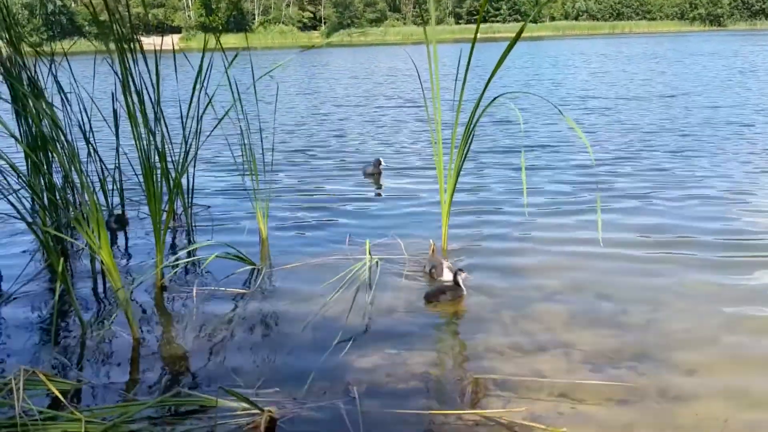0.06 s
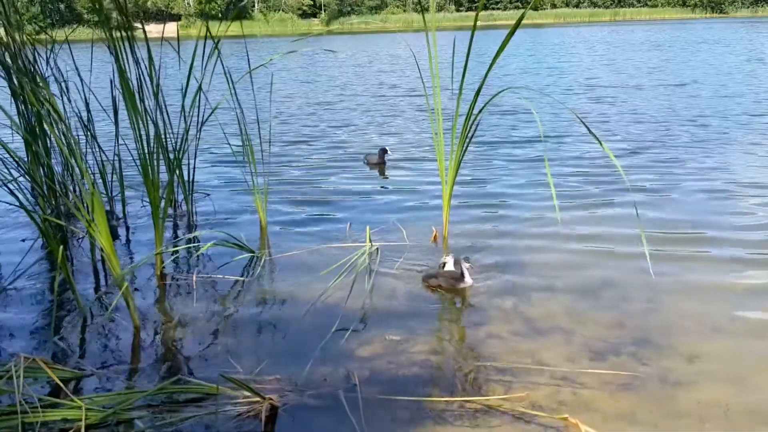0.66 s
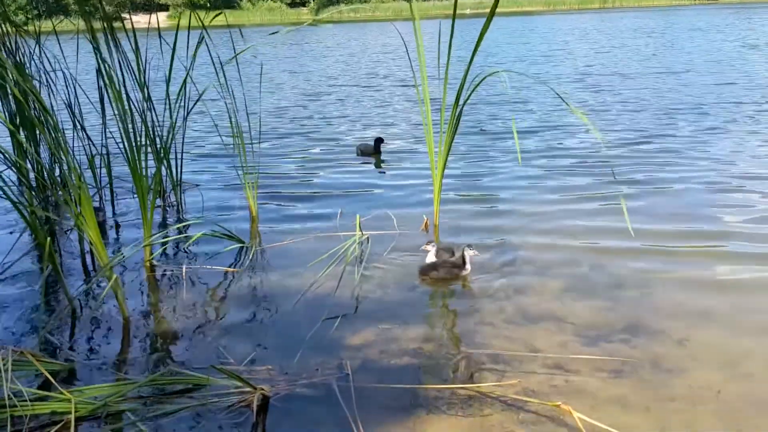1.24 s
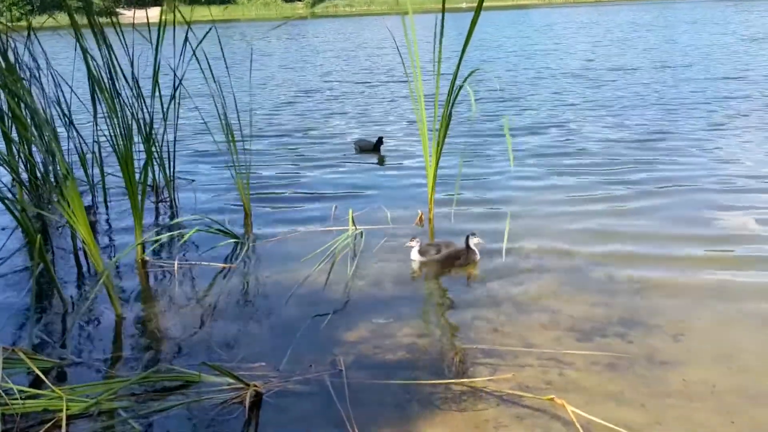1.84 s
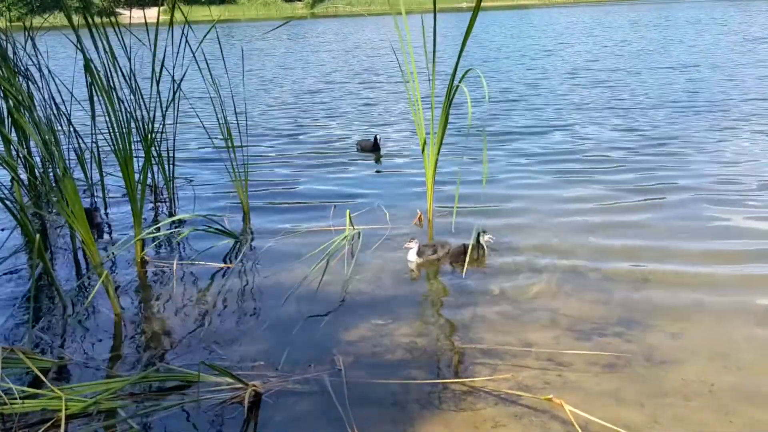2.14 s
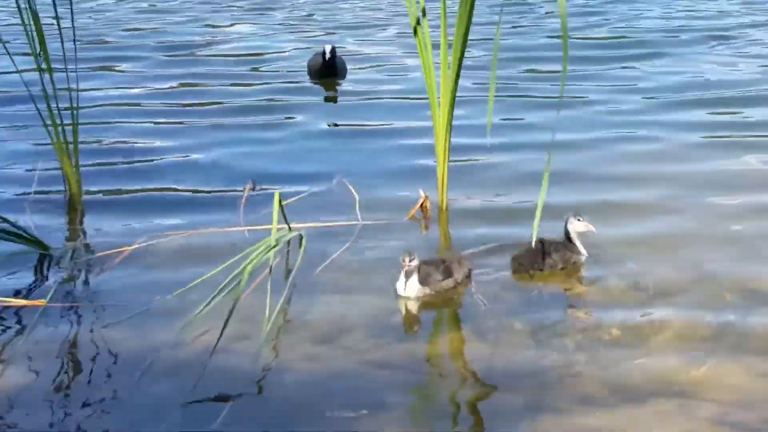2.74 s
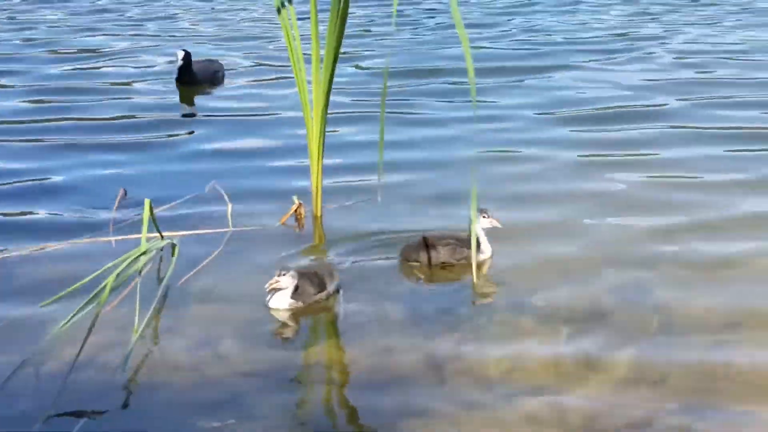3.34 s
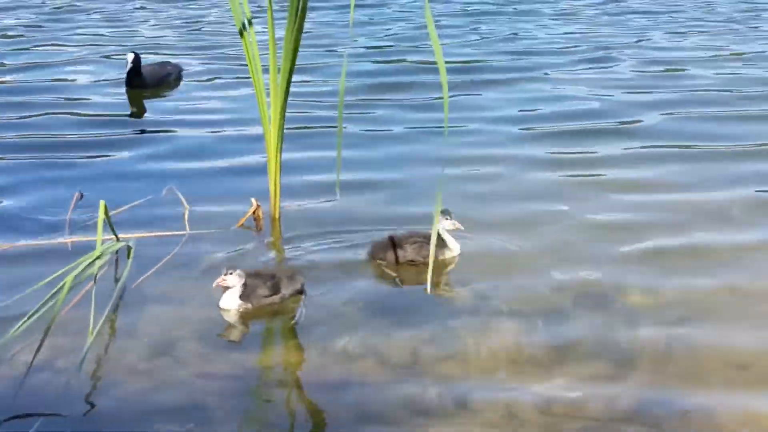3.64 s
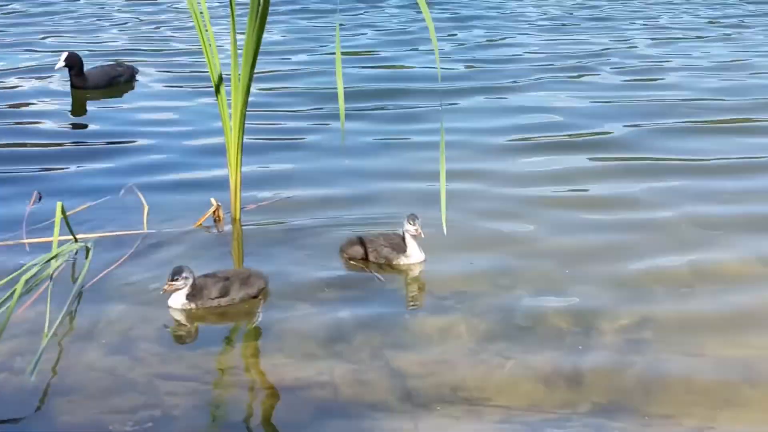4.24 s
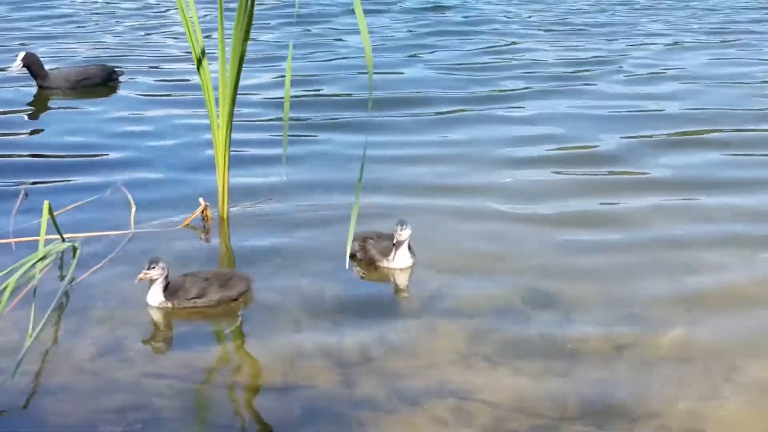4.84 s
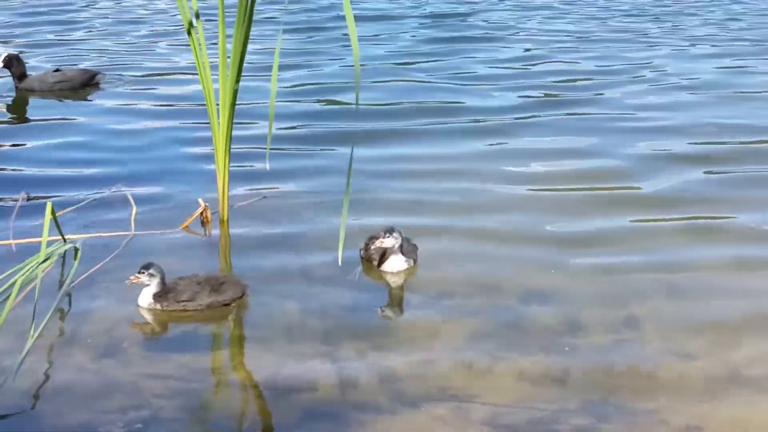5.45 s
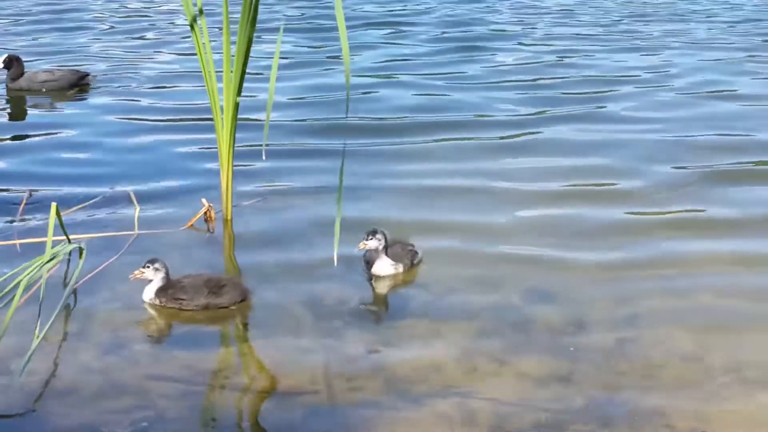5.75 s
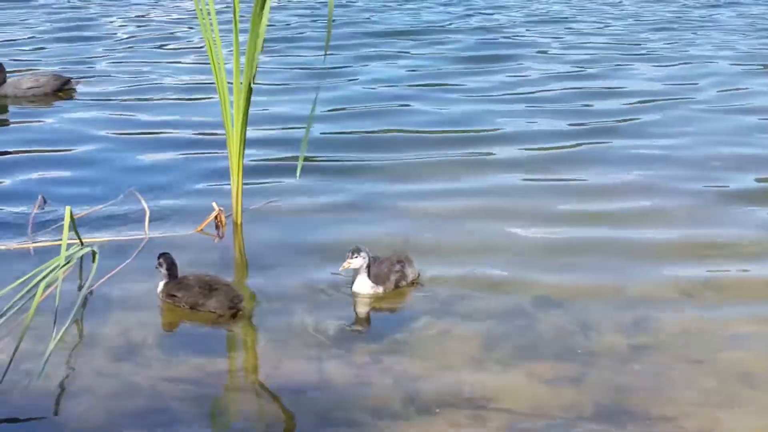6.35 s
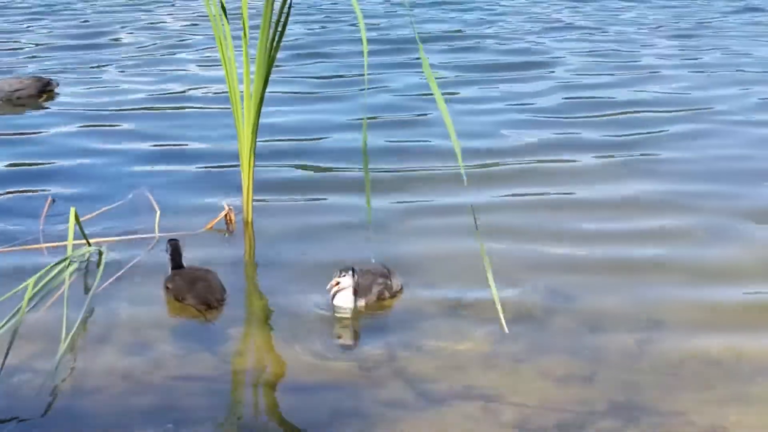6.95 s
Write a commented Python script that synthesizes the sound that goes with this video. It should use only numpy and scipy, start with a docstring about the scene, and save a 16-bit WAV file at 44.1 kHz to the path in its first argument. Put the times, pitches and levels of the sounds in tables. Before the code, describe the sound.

Young coots beg near a lake shore, their thin, raspy whines breaking upward into wavering peeps and whistles, with fainter chick calls between. Wind buffets the microphone with low thumps, mostly in the middle. After it eases, one chick gives a short spitting sneeze, and more whines and peeps follow. Reeds and ripples hiss evenly throughout, and a dull distant drone grows toward the end.

```python
"""Young coots beg off a lake shore: thin whines break upward into peeps and whistles.
Each voice is a vibrating membrane that jitters, splits and rasps when pushed with air.
A fainter chick answers, and one gives a short spitting sneeze: bill snaps, pops, spray.
Gusts buffet the two microphone ports over the hiss of reeds and ripples;
a dull distant drone grows toward the end."""
import sys
import numpy as np
from scipy import signal
from scipy.fft import rfft, irfft, next_fast_len
from scipy.io import wavfile
from scipy.ndimage import uniform_filter1d, map_coordinates

SR = 44100
rng = np.random.default_rng(int(sys.argv[2]) if len(sys.argv) > 2 else 0)


def to_wav(sig):
    """Store sig (one row per channel, or 1-D mono) as 16-bit WAV at the path in sys.argv[1].

    Samples outside -1..1 are clipped; the rate is SR.
    """
    pcm = np.clip(np.atleast_2d(sig), -1, 1) * 32767
    pcm = np.round(pcm).astype(np.int16)
    wavfile.write(sys.argv[1], SR, pcm.T)  # frames by channels


N = 308259
T = np.arange(N) / SR

# One curve per call. Each row: time in seconds, pitch in Hz, tone and air push in relative dB.
WHINE_CALLS = [
    [(0.72, 1470, -75, -70), (0.77, 1440, -68, -65.5), (0.828, 1410, -79, -57), (0.86, 1440, -75, -62.5),
     (0.886, 1390, -74, -69), (0.944, 1400, -74, -68), (1.0, 1470, -77, -69)],
    [(1.012, 1690, -75, -68.5), (1.025, 1677, -65, -66), (1.063, 1520, -70, -70.5), (1.09, 1580, -67, -65),
     (1.117, 1656, -56, -62), (1.127, 1680, -70, -62), (1.175, 1900, -62, -61.5)],
    [(3.165, 1735, -58.5, -64), (3.173, 1724, -57, -67), (3.197, 1660, -54, -54.5),
     (3.231, 1690, -57, -63.5), (3.291, 1648, -59, -59.5), (3.315, 1660, -53.5, -54),
     (3.335, 1650, -49.5, -52), (3.363, 1625, -66.5, -51.5), (3.385, 1635, -51.5, -53.5),
     (3.424, 1655, -50.5, -56), (3.442, 1790, -56, -54), (3.462, 2080, -65, -57)],
    [(5.38, 1750, -61.5, -75.5), (5.432, 1603, -58, -59), (5.486, 1695, -63, -76), (5.528, 1756, -58, -74),
     (5.572, 1692, -55.5, -59), (5.59, 1668, -59, -58.5), (5.656, 1676, -59.5, -67.5),
     (5.668, 1685, -57, -74.5), (5.722, 1689, -57.5, -56.5), (5.782, 1703, -63, -59),
     (5.794, 1667, -56.5, -56), (5.812, 1657, -64.5, -56.5), (5.852, 1540, -56, -59),
     (5.865, 1480, -62, -57.5)],
    [(6.665, 1570, -81, -76.5), (6.691, 1660, -67.5, -70.5), (6.747, 1755, -72.5, -71),
     (6.769, 1800, -73, -87), (6.787, 1790, -70, -79), (6.813, 1840, -74, -63)],
    [(6.895, 1990, -66, -66), (6.903, 1980, -60, -58), (6.915, 1890, -60, -51), (6.928, 1880, -56, -48),
     (6.942, 1970, -55, -46), (6.952, 1930, -57, -46.5), (6.964, 1917, -55, -44.5), (6.972, 1900, -57, -45)],
]
# One row per call: harmonics 1, 2, 3 in dB re tone, then rasp, low and high bill air in dB re push.
WHINE_BILL_DB = [(-29, 4.5, -28, -2, -16, -24), (-14, -2, -23, 0, -18, -18), (-12.5, -1, -25, 0, -3, -7),
                 (-28, -2, -29, .5, -4, -6), (3, 5, 1.5, -7.5, -16.5, -11), (-12, 3, -26, -3.5, -5.5, -9)]
# Throat response at rest pitch. Each row: frequency in Hz, gain in dB.
WHINE_THROAT = [(500, -8), (1000, -0.5), (1350, 13.5), (1640, 23), (1950, 14), (2300, 12), (2750, 17),
                (3250, 16.5), (3700, -2), (4400, -9), (4900, -4), (5600, -5), (6600, 10), (12000, -25)]


def whines():
    """Low register, carried by the membrane's second harmonic."""
    return voice(WHINE_CALLS, WHINE_BILL_DB, WHINE_THROAT, rest_hz=1650,
                 tone_db=10, shimmer_db=1.8, waver=.009, jitter=.026,
                 rasp_db=5, rasp_onset_db=-67.5, rattle=.15, throb=.45, flap_db=-8,
                 thirds=(4, 5), thirds_db=-9, growl_db=8, squeal_db=-3, squeal_onset_db=-88)


# One curve per call. Each row: time in seconds, pitch in Hz, tone and air push in relative dB.
PEEP_CALLS = [
    [(1.177, 2434, -66, -85), (1.187, 2430, -54, -79), (1.199, 2410, -54, -69.5), (1.265, 2515, -51, -71.5),
     (1.282, 2483, -53.5, -60), (1.305, 2565, -50, -57.5), (1.338, 2623, -49, -62), (1.371, 2386, -47, -71),
     (1.385, 2210, -67, -80)],
    [(2.04, 2310, -72, -67.5), (2.11, 2397, -61, -62), (2.2, 2490, -63.5, -58), (2.278, 2658, -57.5, -54),
     (2.308, 2603, -62.5, -52.5), (2.324, 2562, -56, -55.5), (2.348, 2472, -56, -53),
     (2.36, 2342, -75, -50.5)],
    [(2.365, 2970, -49, -59.5), (2.379, 2452, -45.5, -54.5), (2.399, 2052, -42, -57.5),
     (2.411, 1960, -48, -74), (2.422, 1964, -71, -76)],
    [(3.465, 2668, -53.5, -65), (3.5, 2663, -52.5, -55.5), (3.523, 2729, -53, -52), (3.542, 2830, -45, -55),
     (3.556, 3030, -49.5, -50), (3.582, 2927, -47, -51.5), (3.62, 2880, -41, -52.5),
     (3.627, 2740, -49, -54), (3.638, 2655, -54, -62), (3.645, 2490, -61, -70)],
    [(6.816, 2300, -56, -78), (6.828, 2457, -48, -74), (6.838, 2525, -44, -61), (6.879, 2559, -41.5, -61),
     (6.896, 2566, -43, -60), (6.902, 2638, -44, -55), (6.912, 2540, -46, -55), (6.921, 2504, -40, -54)],
]
# One row per call: harmonics 1, 2, 3 in dB re tone, then rasp, low and high bill air in dB re push.
PEEP_BILL_DB = [(-3, -6.5, -18, -1, -.5, 9.5), (-24, -5.5, -25, -10.5, 1.5, -18),
                (-2.5, -23, -32.5, -4.5, 1.5, -16), (1.5, -9.5, -22, -.3, -6.5, 1),
                (1.5, -11.5, -30.5, -6, -8, -1)]
# Throat response at rest pitch. Each row: frequency in Hz, gain in dB.
PEEP_THROAT = [(700, -18), (1450, -12), (1800, 2), (2150, 14.5), (2600, 14), (3100, 12), (3700, 13.5),
               (4400, 9), (4800, 7), (5400, 11), (6300, 4), (7500, -2), (12000, -28)]


def peeps():
    """High register, where the membrane splits more strongly into thirds of its pitch."""
    return voice(PEEP_CALLS, PEEP_BILL_DB, PEEP_THROAT, rest_hz=2600,
                 tone_db=5.5, shimmer_db=1.2, waver=.00613, jitter=.03,
                 rasp_db=7, rasp_onset_db=-73, rattle=.2, throb=.4, flap_db=2,
                 thirds=(2, 4, 5, 7, 8), thirds_db=2, growl_db=-10, squeal_db=8, squeal_onset_db=-57)


def voice(calls, bills, throat, rest_hz, tone_db, shimmer_db, waver, jitter, rasp_db, rasp_onset_db,
          rattle, throb, flap_db, thirds, thirds_db, growl_db, squeal_db, squeal_onset_db):
    """A vibrating membrane; pushed hard, it jitters, splits into thirds of its pitch and rasps."""
    gate, hz, *harmonics_db, push_db, low_air_db, high_air_db = effort(calls, bills)
    drive = above(push_db, rasp_onset_db)
    strain = drive / (drive + sum(undb(db) for db in harmonics_db))
    phase = syrinx(hz, waver, jitter * strain)
    tone = sum(undb(db) * np.sin(k * phase) for k, db in enumerate(harmonics_db, 1))
    chop = 1 + .8 * strain * walk(450)
    tone *= chop * undb(tone_db + shimmer_db * walk(90))
    split = undb(thirds_db) * split_tones(hz, phase, thirds)
    rasp = undb(rasp_db) * throat_rasp(hz, rest_hz, throat, flap_db, rattle)
    growl = undb(growl_db) * strain * np.sin(phase)
    pulsing = unit(1 + throb * np.cos(syrinx(hz / 12, waver=.15, jitter=.2)))
    hoarse = drive * pulsing * (rasp + split + growl)
    squeal = undb(squeal_db) * above(low_air_db, squeal_onset_db) * bill_squeal(hz, phase)
    return gate * (tone + squeal + hoarse + bill_air(low_air_db, high_air_db))


def effort(calls, bills):
    """Gate, pitch and six levels: harmonics follow the tone; rasp and bill air follow the push."""
    shaped = []
    for call, bill in zip(calls, np.array(bills)):
        shaped.append([(s, hz, *(tone_db + bill[:3]), *(push_db + bill[3:]))
                       for s, hz, tone_db, push_db in call])
    return phrases(shaped, edge_s=.0021)


def syrinx(hz, waver, jitter):
    """Phase of a membrane whose pitch trembles slowly and jitters fast."""
    return 2 * np.pi * np.cumsum(hz * (1 + waver * walk(70) + jitter * walk(900))) / SR


def split_tones(hz, phase, thirds):
    """Wandering partials at thirds of the pitch; the throat passes 2.2-4.5 kHz best."""
    out = np.zeros(N)
    for k in thirds:
        throat_gain = np.interp(k * hz / 3, [1500, 2200, 4500, 7000], [.5, 1, 1, .4])
        out += throat_gain * (1 + .5 * walk(160)) * np.sin(k * phase / 3 + 1.1 * walk(450))
    return out


def throat_rasp(hz, rest_hz, throat, flap_db, rattle):
    """Turbulence and irregular flaps; the throat tightens with pitch, so its resonances glide."""
    flap_phase = syrinx(hz / 6, waver=.04, jitter=.05)
    flaps = unit(np.exp(60 * (np.cos(flap_phase) - 1)))
    at_rest = colour(rng.standard_normal(N) + undb(flap_db) * flaps, throat)
    gliding = map_coordinates(at_rest, [np.cumsum(hz / rest_hz)], mode="mirror")
    return gliding * unit(np.exp(rattle * walk(300)))


def bill_squeal(hz, phase, resonance_hz=9800, width_hz=1000):
    """Whichever high harmonic meets the bill's resonance squeals."""
    squeal = sum(np.exp(-((k * hz - resonance_hz) / width_hz) ** 2) * np.sin(k * phase)
                 for k in (4, 5, 6))
    return squeal * (1 + .9 * walk(400))


def bill_air(low_db, high_db):
    """Air forced through the bill rings two treble bands."""
    low_hz_db = [(7000, -48), (8400, 7), (10000, 13), (10600, -2), (11400, 2), (12600, -4)]
    high_hz_db = [(10500, 9), (12400, -2), (13600, 8.5), (15000, -2), (15700, 2)]
    low = above(low_db, -81) * colour(rng.standard_normal(N), low_hz_db)
    high = above(high_db, -85) * colour(rng.standard_normal(N), high_hz_db)
    return (low + undb(-3) * high) * undb(1.7 * walk(150))


# Each row: start and length in seconds, first, middle and last pitch in Hz, relative level in dB,
# attack in seconds, trill depth from 0 to 1.
WHISTLE_NOTES = [ (0.575, 0.13, 2065, 2380, 2240, -69, 0.022, 0.5),
                 (0.747, 0.21, 8750, 8330, 8450, -65.5, .02, 0),
                 (0.997, 0.17, 9000, 9100, 8900, -72, .02, 0), (1.153, 0.04, 2320, 2150, 1840, -61, .01, 0),
                 (1.981, 0.2, 2090, 2034, 1976, -59.5, 0.033, 0.9),
                 (2.234, 0.045, 2320, 2070, 1860, -56, 0.019, 0.02),
                 (2.361, .03, 3600, 2946, 2300, -48, .012, .4),
                 (2.451, 0.056, 2520, 2460, 2305, -62.5, 0.0073, 0),
                 (2.511, 0.073, 2440, 2466, 2324, -60.5, .01, 0.1),
                 (2.589, 0.097, 2320, 2400, 2310, -67, .01, .4),
                 (2.84, 0.13, 1936, 1883, 1954, -57.5, 0.055, 0),
                 (2.952, 0.082, 1916, 2520, 2910, -60, .01, 0.2),
                 (3.039, 0.059, 2420, 2220, 2130, -62.5, .01, .4),
                 (3.116, 0.12, 2260, 2086, 1910, -60, .008, 0.1),
                 (3.235, 0.048, 2200, 2020, 1975, -63, 0.0073, 0),
                 (3.318, 0.11, 5110, 4690, 5240, -53.5, 0.0087, 0),
                 (3.385, 0.077, 1522, 1423, 1393, -51.5, 0.017, .3),
                 (3.463, 0.0297, 2620, 2070, 1823, -50, 0.0062, 0),
                 (3.465, .05, 7990, 7900, 7800, -57, .008, 0),
                 (3.474, 0.11, 4320, 4440, 4860, -48, 0.013, 0.8),
                 (3.502, 0.084, 2350, 2320, 2420, -49, 0.035, .9),
                 (5.853, 0.033, 2750, 2290, 1920, -55.5, .007, 0.1),
                 (6.545, 0.033, 3360, 3050, 3030, -65.5, .008, 0),
                 (6.725, 0.059, 2850, 3100, 3380, -58, 0.0069, 0),
                 (6.84, 0.03, 4255, 4225, 4270, -54, 0.0071, 0),
                 (6.972, 0.036, 4590, 4560, 4540, -42.5, 0.0031, 0), ]
# Each row: relative level in dB, pitch jitter in Hz.
JITTER_BY_LEVEL = [(-66, 80), (-58, 52), (-48, 48)]


def whistles(release_s=.004, trill_hz=47, smooth_share=.35):
    """Thin whistles and chips bend through an arc and may trill; softer ones are breathier."""
    out = np.zeros(N)
    waver, jitter, shimmer = .0059 * walk(70), walk(900), undb(1.7 * walk(100))
    for start_s, length_s, first_hz, middle_hz, last_hz, db, attack_s, depth in WHISTLE_NOTES:
        on = (T >= start_s) & (T < start_s + length_s)
        age_s = T[on] - start_s
        arc = np.polyfit([0, .5, 1], [first_hz, middle_hz, last_hz], 2)
        hz = np.polyval(arc, age_s / length_s)
        jitter_hz = np.interp(db, *np.transpose(JITTER_BY_LEVEL))
        phase = 2 * np.pi * np.cumsum(hz * (1 + waver[on]) + jitter_hz * jitter[on]) / SR
        envelope = np.minimum(age_s / attack_s, 1) * np.minimum((length_s - age_s) / release_s, 1)
        trill_ramp = np.clip((age_s - smooth_share * length_s) * 2 * trill_hz, 0, 1)
        trill = unit(1 - depth * trill_ramp * np.cos(2 * np.pi * trill_hz * age_s))
        tilt_db = np.interp(hz, [2500, 4300], [3, 1])
        out[on] += undb(db + tilt_db) * envelope * trill * shimmer[on] * np.sin(phase)
    return out


# Each row: start in seconds, level in dB, centre and width in Hz, decay in seconds.
BILL_SNAPS = [(5.1526, -22, 13500, 8000, .0008), (5.1528, -32, 4500, 4000, .001),
              (5.1558, -30, 7000, 12000, .0012)]
# Each row: start in seconds, level in dB, pitch in Hz, decay in seconds.
AIR_POPS = [(5.1560, -23.5, 760, 0.0011), (5.1608, -29, 636, 0.0043), (5.1606, -34, 405, 0.0058),
            (5.165, -28.5, 690, 0.00034)]
# Each row: frequency in Hz, gain in dB.
SPRAY_SPECTRUM = [(1000, -9), (2000, -13), (3100, 1.5), (4200, -17), (5300, 4.5), (7200, 4), (8600, -5),
                  (11500, -3.5), (13800, 8), (15500, 3.5)]
# Each row: time in seconds, level in dB.
SPRAY_ENVELOPE = [(5.1525, -33), (5.156, -43), (5.17, -40.5), (5.19, -45), (5.23, -43.5), (5.25, -52),
                  (5.275, -57)]


def sneeze():
    """The bill snaps, air pops out, and a fine spray hisses after it."""
    gate, spray_db = phrases([SPRAY_ENVELOPE], edge_s=.011)
    out = gate * colour(stereo_noise(.047), SPRAY_SPECTRUM) * undb(spray_db + .89 * walk(550))
    for start_s, db, hz, width_hz, decay_s in BILL_SNAPS:
        band_hz_db = [(max(hz - width_hz / 2, 500), -4), (hz, 0), (hz + width_hz / 2, -4)]
        envelope = (T >= start_s) * np.exp(-np.abs(T - start_s) / decay_s)
        out += undb(db) * envelope * colour(stereo_noise(.024), band_hz_db)
    for start_s, db, hz, decay_s in AIR_POPS:
        age_s = np.maximum(T - start_s, 0)
        out += undb(db) * np.sin(2 * np.pi * hz * age_s) * np.exp(-age_s / decay_s)
    return out


# Each row: frequency in Hz, phase lag of the left port in radians.
LEFT_PORT_LAG = [(0, -1), (1700, 2.05), (1790, 5), (1950, 5), (2330, 7), (2580, 8), (2680, 10.5), (2900, 9),
                 (3080, 8), (3400, 8), (4400, 14.5), (5200, 13), (9000, 20.5), (14000, 25.5)]


def over_water(x, wet_db, t60_s, pan_db):
    """The two ports hear the birds out of step; reeds and bank scatter a short tail."""
    size = next_fast_len(N)
    lag_rad = np.interp(np.arange(size // 2 + 1) * SR / size, *np.transpose(LEFT_PORT_LAG))
    left = irfft(rfft(x, size) * np.exp(-1j * lag_rad), size)[:N]
    direct = np.array([left * undb(pan_db / 2), x * undb(-pan_db / 2)])
    age_s = T[:SR // 2]
    tail = rng.standard_normal((2, len(age_s))) * undb(-60 * age_s / t60_s) * (age_s > .003)
    tail /= np.sqrt(np.sum(tail ** 2, axis=1, keepdims=True))
    return direct + undb(wet_db) * signal.fftconvolve(x[None], tail, axes=1)[:, :N]


# Each row: time in seconds, relative level in dB.
GUST_ENVELOPE = [(0.0, -70.5), (0.64, -67.5), (0.82, -70.5), (1.75, -71.5), (1.87, -55), (2.2, -74.5),
                 (2.33, -60), (2.49, -52), (2.74, -45.5), (3.02, -54.5), (3.39, -49.5), (3.56, -50),
                 (3.63, -64), (3.95, -61.5), (4.36, -60.5), (4.65, -48.5), (4.78, -55.5), (4.84, -65),
                 (5.04, -73), (6.99, -87)]
# Each row: centre in seconds, relative peak in dB, length in seconds.
WIND_BUFFETS = [(0.298, -57, 0.024), (0.43, -58, .03), (0.649, -56, 0.088), (1.117, -57, 0.05),
                (1.303, -54.5, 0.17), (1.53, -52.5, 0.022), (1.716, -54.5, 0.071), (1.832, -48.5, 0.033),
                (1.924, -56, 0.06), (1.975, -48, 0.037), (2.04, -59, 0.073), (2.312, -48, 0.044),
                (2.384, -39.5, 0.12), (2.602, -36, 0.072), (2.65, -31, 0.061), (2.777, -50, 0.059),
                (2.855, -42, 0.051), (2.967, -42, 0.087), (3.069, -33.5, 0.05), (3.107, -43.5, 0.038),
                (3.25, -32.5, 0.089), (3.393, -38, 0.11), (3.82, -49, 0.13), (4.061, -46, 0.047),
                (4.128, -46, 0.047), (4.242, -39, 0.071), (4.299, -41.5, 0.064), (4.44, -55, 0.077),
                (4.548, -40, 0.032), (4.641, -33, 0.038), (4.777, -46.5, 0.068), (5.592, -50, 0.056),
                (6.307, -51.5, 0.053)]
# Each row: frequency in Hz, gain in dB.
EDDY_SPECTRUM = [(25, -42), (40, -21), (64, 2.5), (88, 3), (120, 1), (170, -5), (280, -17.5), (400, -46),
                 (700, -52)]


def wind(gust_gain_db=2.5, flutter_db=3, flutter_hz=13, fine_gain_db=-13.5, fine_onset_db=-47.5):
    """Eddies push on the ports: a low flutter with short buffets; hard ones shed finer eddies."""
    power = undb(curves(GUST_ENVELOPE)[0] + gust_gain_db + flutter_db * walk(flutter_hz)) ** 2
    for centre_s, db, length_s in WIND_BUFFETS:
        power += undb(db) ** 2 * np.exp(-np.pi * np.minimum((2 * (T - centre_s) / length_s) ** 2, 20))
    eddies = colour(stereo_noise(.027), EDDY_SPECTRUM)
    # Levelled so that each buffet carries its full force.
    eddies /= np.sqrt(uniform_filter1d(np.mean(eddies ** 2, axis=0), int(.0563 * SR)))
    fine = colour(stereo_noise(.1), [(110, -12), (170, -2.5), (240, -4), (340, -24)])
    fine *= undb(fine_gain_db) * above(10 * np.log10(power), fine_onset_db)
    return undb(.5) * np.sqrt(power) * eddies + fine


# Each row: frequency in Hz, gain in dB.
SHORE_SPECTRUM = [(150, -50), (260, 6), (298, -45), (399, -2), (524, -4), (666, -1), (954, -4),
                  (1170, -3.5), (1540, -10), (2280, -3), (2490, -3), (4370, -4), (7300, -4.5), (10600, -13),
                  (15500, -10.5)]


def shore(level_db=-58.14):
    """Reeds and ripples hiss almost evenly."""
    ripple_db = .25 * walk(3) + .4 * walk(25)
    return colour(stereo_noise(.0099), SHORE_SPECTRUM) * undb(level_db + ripple_db)


# Each row: frequency in Hz, gain in dB.
DRONE_SPECTRUM = [(41, -4), (70, -8.5), (107, 1), (140, -3), (233, -2), (447, -10.5), (670, -16.5),
                  (924, -30), (1200, -76), (1560, -71), (2640, -120)]
# Each row: time in seconds, level in dB.
DRONE_ENVELOPE = [(0, -75), (3.8, -63), (4.6, -65.5), (5.4, -61.5), (6.3, -62), (6.99, -60)]


def drone():
    """A dull drone grows far away."""
    rumble = colour(stereo_noise(.95), DRONE_SPECTRUM)
    return rumble * undb(curves(DRONE_ENVELOPE)[0] + .64 * walk(16))


def undb(db):
    """Decibels to gain."""
    return 10 ** (np.asarray(db) / 20)


def unit(x):
    """Scale to rms 1."""
    return x / np.sqrt(np.mean(np.abs(x) ** 2))


def above(db, threshold_db):
    """Gain of a sound that only sets in over a threshold."""
    return np.sqrt(np.maximum(undb(db) ** 2 - undb(threshold_db) ** 2, 0))


def colour(x, points):
    """Filter by (Hz, dB) points, falling steeply beyond the ends; rms 1."""
    hz, db = np.transpose(points)
    size = next_fast_len(N)
    log_hz = np.log(np.maximum(np.arange(size // 2 + 1) * SR / size, 1))
    beyond = np.abs(log_hz - np.clip(log_hz, np.log(hz[0]), np.log(hz[-1])))
    gain = undb(np.interp(log_hz, np.log(hz), db) - 400 * beyond)
    return unit(irfft(rfft(x, size) * gain, size)[..., :N])


def walk(rate_hz):
    """Smooth random curve, rms 1."""
    hold = max(int(SR / rate_hz), 1)
    steps = np.repeat(rng.standard_normal(N // hold + 1), hold)
    return unit(uniform_filter1d(steps, hold)[:N])


def stereo_noise(correlation):
    """Left and right white noise, partly alike."""
    mid, side = rng.standard_normal((2, N))
    return np.sqrt(1 + correlation) * mid + np.sqrt(1 - correlation) * np.array([side, -side])


def curves(rows):
    """Columns of a timed table at every sample."""
    times_s, *columns = np.transpose(rows)
    return [np.interp(T, times_s, column) for column in columns]


def phrases(calls, edge_s):
    """A gate that opens during each call, then the curves of all calls."""
    gate = sum(np.clip(np.minimum(T - call[0][0], call[-1][0] - T) / edge_s + .5, 0, 1)
               for call in calls)
    rows = sorted(tuple(row) for call in calls for row in call)
    return [np.minimum(gate, 1)] + curves(rows)


def scene():
    """Chicks on the water, wind, shore and drone."""
    chicks = over_water(whines() + peeps() + whistles(), wet_db=-5, t60_s=.073, pan_db=-1)
    return chicks + sneeze() + wind() + shore() + drone()


def record(dry):
    """The recorder cuts the deepest bass and the top."""
    low_hz, top_hz = 36, 15750
    highpass = signal.butter(2, low_hz, "highpass", fs=SR, output="sos")
    lowpass = signal.ellip(10, .2, 70, top_hz, fs=SR, output="sos")
    return signal.sosfilt(lowpass, signal.sosfilt(highpass, dry))


dry = scene()
out = record(dry)
to_wav(out)
```